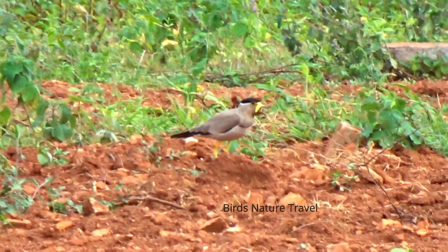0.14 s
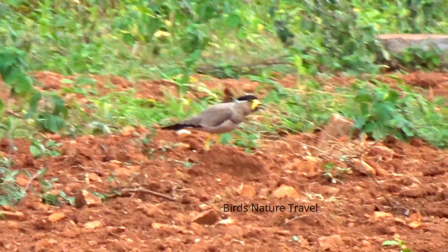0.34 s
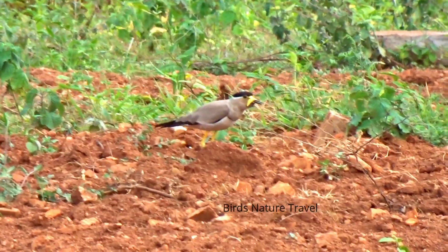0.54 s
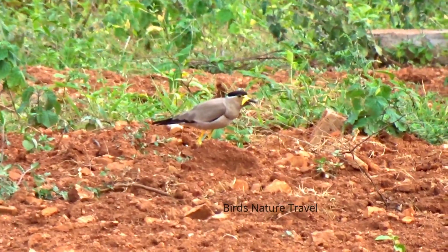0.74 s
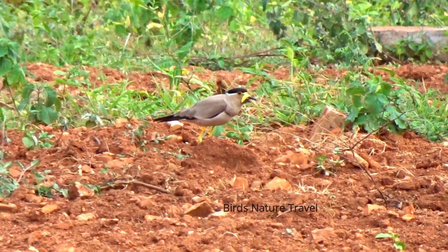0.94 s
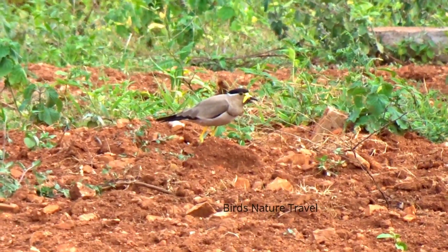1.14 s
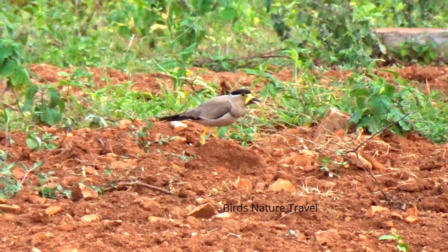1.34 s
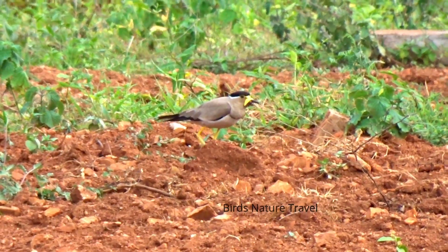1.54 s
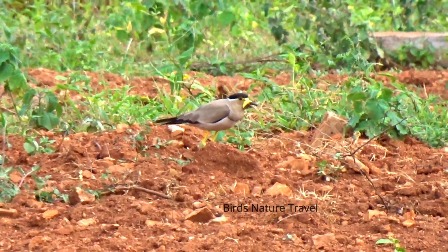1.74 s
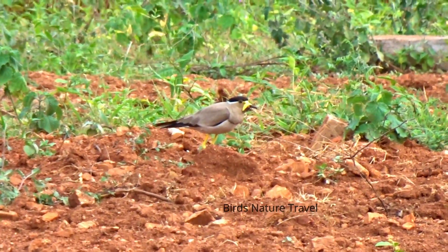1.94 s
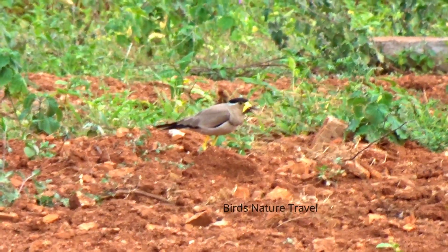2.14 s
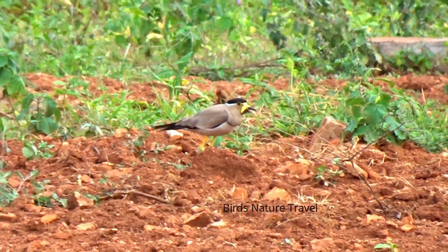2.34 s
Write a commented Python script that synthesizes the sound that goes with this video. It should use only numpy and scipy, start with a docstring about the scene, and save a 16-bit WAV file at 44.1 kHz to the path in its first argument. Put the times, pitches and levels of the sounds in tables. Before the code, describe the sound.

A lapwing gives a single sinking cry, with far birds and small clicks in a field.

```python
"""One long lapwing call over open ground: a clear, slowly sinking note drops into a soft, fluttering buzz.
The voice is a stack of harmonics shaped by throat and bill, scattered back by soil and bushes.
Small birds whistle far off. Close by, a woody click rings during the call and two dry snaps come late.
Under it all lies a steady distant rush of noise with a low, wavering hum."""
import sys
import numpy as np
from scipy import signal
from scipy.fft import rfft, irfft
from scipy.io import wavfile
from scipy.ndimage import uniform_filter1d

SR = 44100
rng = np.random.default_rng(int(sys.argv[2]) if len(sys.argv) > 2 else 0)


def log_audio(samples):
    """Write samples as a 16-bit WAV file to the path given in sys.argv[1]."""
    # one column per channel
    frames = np.atleast_2d(samples).T
    # limit to full scale, then quantise
    limited = np.clip(frames, -1, 1)
    pcm = np.round(limited * 32767).astype(np.int16)
    wavfile.write(sys.argv[1], SR, pcm)


N = 110250


def undb(db):
    """Decibels to gain."""
    return 10 ** (np.asarray(db) / 20)


def unit(x):
    """Scale to rms 1."""
    return x / np.sqrt(np.mean(x ** 2))


def curve_at(table, hz):
    """Read a curve of (Hz, value) rows on a log-frequency axis."""
    freqs, values = np.array(table, float).T
    return np.interp(np.log(np.maximum(hz, 1)), np.log(freqs), values)


def pan(db):
    """Left and right gains for a left-minus-right level in dB."""
    gains = undb(np.array([[.5], [-.5]]) * db)
    return gains / np.sqrt(np.mean(gains ** 2, axis=0))


def wander(rate_hz):
    """Smooth random motion, rms 1."""
    f = np.fft.rfftfreq(N, 1 / SR)
    return unit(irfft(rfft(rng.standard_normal(N)) * np.exp(-(f / rate_hz) ** 2), N))


def noise_band(hz, width_hz):
    """Noise in one resonance, rms 1."""
    f = np.fft.rfftfreq(N, 1 / SR)
    detuning = (f * f - hz * hz) / (f * width_hz + 1)
    return unit(irfft(rfft(rng.standard_normal(N)) / (1 + detuning ** 2 / 2), N))


def cut_bass(x):
    """Small things radiate little bass."""
    return signal.sosfilt(signal.butter(2, 450, "high", fs=SR, output="sos"), x)


def field_echo(x, t60_s=.85, delay_s=.012):
    """Scatter from soil and bushes: a fading tail, different at each ear."""
    t = np.arange(SR) / SR
    tail = rng.standard_normal((2, SR)) * np.exp(-np.log(1000) * t / t60_s) * (t > delay_s)
    return signal.fftconvolve(x[None], unit(tail) / np.sqrt(SR), axes=1)[:, :N]


def distant_rush(t, level_db=-60.5, swell_hz=670, swell_octaves=.66, flicker_db=.74):
    """A bed of far noise, centred in the bass and wide in the treble; its low mids swell and flicker."""
    # Each row: frequency in Hz, relative noise density in dB.
    tone = [(18, -74), (30, -37), (169, -25.5), (364, -9.5), (392, -3.5), (422, -10), (709, -4),
            (953, -9.5), (1640, -9), (1860, -13), (2050, -14), (2900, -18), (3280, -15), (3710, -17.5),
            (4090, -20.5), (4520, -21.5), (11000, -32), (14300, -86), (22000, -120)]
    # Each row: frequency in Hz, correlation of left and right.
    likeness = [(60, .85), (270, .91), (570, 0.86), (1200, 0.27), (2500, 0.04), (5400, 0)]
    # Each row: frequency in Hz, left minus right in dB.
    balance = [(110, 0), (350, 0), (620, -2.5), (2000, -4), (3500, 0.5), (11000, -1)]
    # Each row: time in seconds, gain of the low mids in dB.
    swells = [(0, 0), (.35, 2.5), (.85, 1), (1.15, 0.5), (1.4, 0), (1.55, 5), (1.72, 3), (2.1, 2),
              (2.25, -1), (2.5, 3)]
    f = np.fft.rfftfreq(N, 1 / SR)
    alike = curve_at(likeness, f)
    mid, side = rfft(rng.standard_normal((2, N)))
    stereo = mid * np.sqrt(1 + alike) + np.array([[1], [-1]]) * side * np.sqrt(1 - alike)
    spectrum = stereo * undb(curve_at(tone, f)) * pan(curve_at(balance, f))
    swell_band = np.exp(-(np.log2((f + 1) / swell_hz) / swell_octaves) ** 2 / 2)
    bed, low_mids = irfft(spectrum, N), irfft(spectrum * swell_band, N)
    swell = undb(np.interp(t, *np.array(swells).T) + flicker_db * wander(24))
    return (bed + low_mids * (swell - 1)) / np.std(bed) * undb(level_db)


def low_hum(pitch_hz=394.5, level_db=-72, waver_db=2):
    """A faint sine, a little to the right, wavering in level and pitch."""
    gain = np.sqrt(2) * undb(level_db + waver_db * wander(4.1))
    hz = pitch_hz * (1 + .0097 * wander(14.2))
    return gain * np.sin(2 * np.pi * np.cumsum(hz) / SR) * pan(-4.3)


def far_birds(t, waver=.011, flicker_db=3, twitter_db=-82, echo_db=-7):
    """Thin gliding whistles, blurred by distance, over a faint twitter from farther still."""
    # Each row: start and length in seconds, first, middle and last pitch in Hz, relative level in dB.
    chirps = [(0.125, 0.1, 4000, 4200, 4770, -75), (0.686, .06, 6800, 6400, 6280, -71.5),
              (0.739, 0.086, 6200, 5460, 4670, -65.5), (0.746, .016, 5300, 4770, 4460, -65.5),
              (0.804, 0.13, 3980, 3776, 3680, -68.5), (0.915, 0.043, 2650, 2526, 2810, -62),
              (0.932, 0.045, 2990, 3250, 3310, -63), (1.219, 0.15, 2150, 2045, 1935, -70.5),
              (1.717, 0.13, 3910, 4030, 3890, -72), (1.772, 0.062, 3085, 3290, 3320, -74),
              (2.128, .027, 3835, 4040, 4200, -64.5), (2.151, 0.041, 4640, 5100, 5460, -77),
              (2.408, 0.066, 4240, 4330, 4320, -71), (2.451, 0.021, 3900, 4070, 4180, -64),
              (2.465, 0.036, 4600, 4950, 5200, -75)]
    whistles = np.zeros(N)
    for start, length, first_hz, mid_hz, last_hz, db in chirps:
        progress = np.clip((t - start) / length, 0, 1)
        glide = np.polyfit([0, .5, 1], [first_hz, mid_hz, last_hz], 2)
        hz = np.polyval(glide, progress) * (1 + waver * wander(250))
        envelope = np.sqrt(2 * np.abs(np.sin(np.pi * progress)))
        whistles += undb(db) * envelope * np.sin(2 * np.pi * np.cumsum(hz) / SR)
    whistles *= undb(flicker_db * (wander(82) - .5))
    twitter = noise_band(hz=4150, width_hz=980) * undb(twitter_db + 4 * wander(25))
    return whistles + twitter + undb(echo_db) * field_echo(whistles)


def dry_snaps(t, attack_s=.00052, echo_db=-8):
    """Two small crackles: noise in a few broad resonances, dying fast."""
    # Each row: start in seconds, level in dB, pitch factor, t60 in seconds, left minus right in dB.
    hits = [(2.3348, -44, 1.003, 0.059, -2), (2.48, -54, 1.08, 0.083, -1)]
    # Each row: centre in Hz before the pitch factor, width in Hz, relative level in dB.
    modes = [(960, 120, 3.5), (1870, 460, 1), (2420, 210, -1), (3320, 300, 0), (5930, 6000, -16.5)]
    out = 0
    for start, db, pitch, t60, side_db in hits:
        age = np.maximum(t - start, 0)
        ring = unit(sum(undb(mode_db) * noise_band(hz * pitch, width) for hz, width, mode_db in modes))
        envelope = np.minimum(age / attack_s, 1) * np.exp(-np.log(1000) * age / t60)
        snap = undb(db) * ring * envelope
        out += snap * pan(side_db) + undb(echo_db) * field_echo(snap)
    return cut_bass(out)


def woody_click(t, start_s=.5273, level_db=-34):
    """One sharp click on the right: staggered resonances that die within a few cycles."""
    # Each row: frequency in Hz, delay in seconds, rise time in seconds, relative level in dB.
    modes = [(8100, 0, 0.00014, -12), (3430, 0.0031, 0.00039, -2.5), (2390, .0006, 0.00035, 1),
             (896, 0.0018, 0.00084, -9)]
    ring = 0
    for hz, delay, rise, db in modes:
        age = np.maximum(t - start_s - delay, 0)
        envelope = age / rise * np.exp(1 - age / rise)
        ring += undb(db) * envelope * np.sin(2 * np.pi * hz * age)
    return undb(level_db) * cut_bass(ring) * pan(-10)


def lapwing(t):
    """Harmonics through throat and bill resonances; as the pitch drops, the voice rasps and flutters."""
    # Each row: time in seconds, pitch in Hz, level ahead of the throat in dB, brightness in dB/octave.
    contour = [(0.2354, 1670, -59, 13), (.238, 1690, -48, 4), (0.24, 1764, -44.5, 3), (.25, 1764, -42.5, 4),
               (0.275, 1694, -41.5, 1.5), (.298, 1661, -41, 2), (.355, 1650, -39.5, 3),
               (0.406, 1625, -39.5, 3), (0.433, 1600, -41, 0), (.449, 1574, -42.5, -0.5),
               (0.462, 1494, -51.5, 1), (0.487, 1424, -51.5, -3), (.52, 1365, -52.5, -2.5),
               (.585, 1335, -54.5, 1), (0.606, 1329, -55, -1)]
    # Throat and bill resonances. Each row: frequency in Hz, gain in dB.
    throat = [(1300, -17), (1700, -17), (2650, 0), (3350, 1), (4100, -4), (5000, -7.5), (5600, -2.5),
              (6700, -16), (7300, -19), (8250, -15), (8900, -21), (9900, -39.5), (11000, -31), (13000, -49)]
    # Each row: frequency in Hz, left minus right in dB.
    balance = [(1600, 1.5), (3300, 1), (5000, 3), (6600, 4), (8200, 10), (10000, 3)]
    start_s, end_s, attack_s, release_s = .234, .615, .002, .0025
    buzz_start_s, buzz_rise_s = .475, .05
    flutter_hz, flutter_depth, flutter_tilt = 107.5, .027, 3.2  # tilts are in dB/octave
    squeak_s, squeak_jump, squeak_tilt, squeak_db = .6065, .092, 7, -2
    rasp_db, buzz_rasp_db, echo_db, leaf_hz = -30, -13, -20, 3300

    times, *columns = np.array(contour).T
    hz, db, tilt = (np.interp(t, times, column) for column in columns)
    hz = uniform_filter1d(hz, size=200)
    buzz = np.clip((t - buzz_start_s) / buzz_rise_s, 0, 1)
    # A last squeak cuts off the flutter within a millisecond: higher, brighter and weaker.
    squeak = np.clip((t - squeak_s) * 1000, 0, 1)
    flutter = -buzz * (1 - squeak) * np.cos(2 * np.pi * flutter_hz * (t - buzz_start_s))
    jitter = (.00076 + .008 * buzz) * wander(460)
    hz *= 1 + squeak_jump * squeak + flutter_depth * flutter + jitter
    tilt += squeak_tilt * squeak + flutter_tilt * flutter
    phase = 2 * np.pi * np.cumsum(hz) / SR
    rasp = (undb(rasp_db) + buzz * undb(buzz_rasp_db)) * noise_band(hz=4500, width_hz=2200)
    harmonics = 0
    for k in range(1, 8):
        shimmer_db = (.5 + 1.5 * buzz) * wander(220)
        gain = undb(curve_at(throat, k * hz) + tilt * np.log2(max(k / 2, 1)) + shimmer_db)
        harmonics += np.sqrt(2) * gain * np.sin(k * phase) * pan(curve_at(balance, k * hz))
    gate = np.clip((t - start_s) / attack_s, 0, 1) * np.clip((end_s - t) / release_s, 0, 1)
    voice = (harmonics + rasp) * gate * undb(db + squeak_db * squeak)
    # Bushes return treble more strongly: the send rises with frequency, near unity at leaf_hz.
    echo_send = np.gradient(voice.mean(axis=0)) * SR / (2 * np.pi * leaf_hz)
    return voice + undb(echo_db) * field_echo(echo_send)


def scene():
    """The lapwing in front, small sounds around it and the rush behind, in stereo."""
    t = np.arange(N) / SR
    return lapwing(t) + far_birds(t) + dry_snaps(t) + woody_click(t) + distant_rush(t) + low_hum()


def record(dry):
    """A steep low-pass takes off the treble above 11 kHz."""
    return signal.sosfilt(signal.ellip(10, .2, 60, 11000, fs=SR, output="sos"), dry)


dry = scene()
out = record(dry)
log_audio(out)
```